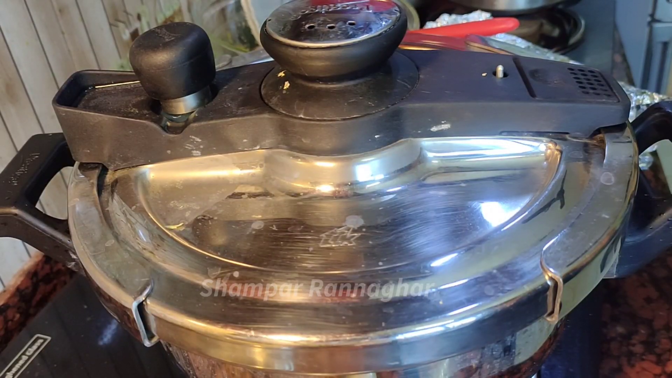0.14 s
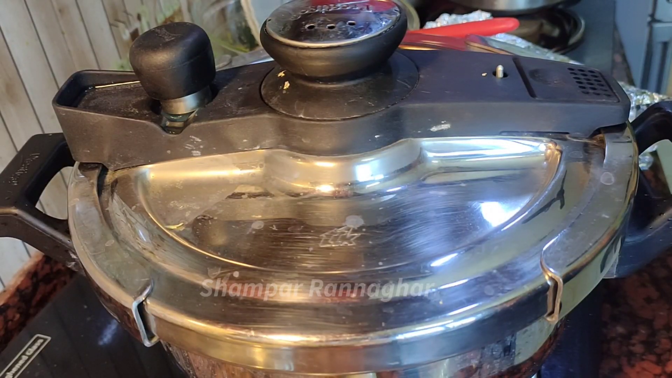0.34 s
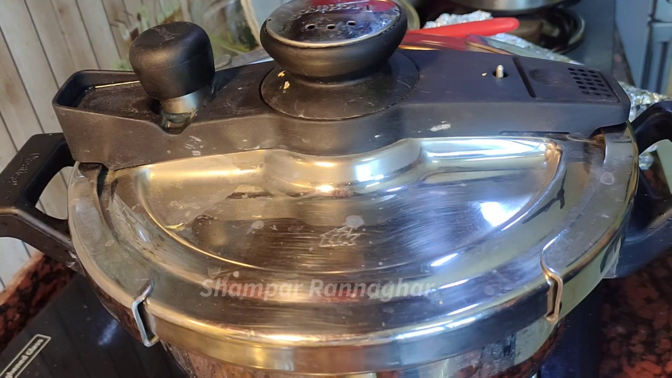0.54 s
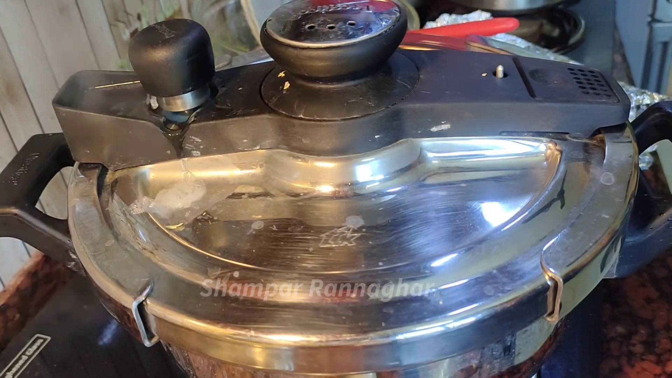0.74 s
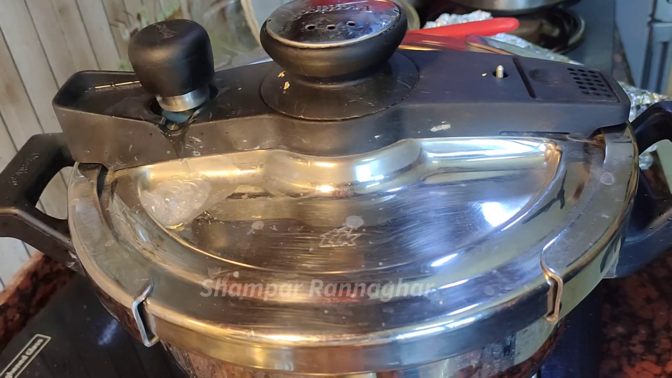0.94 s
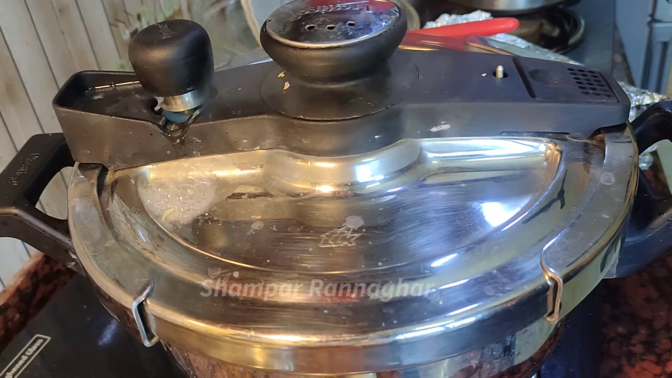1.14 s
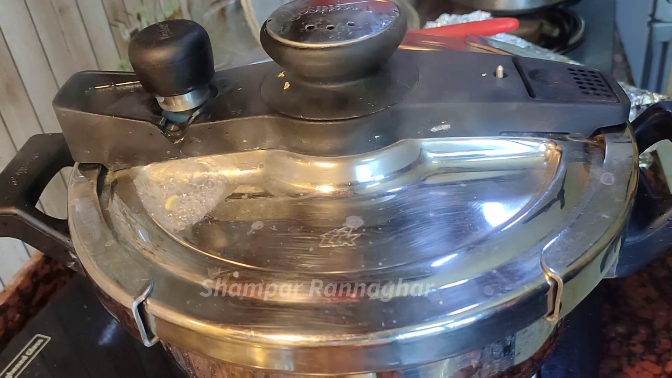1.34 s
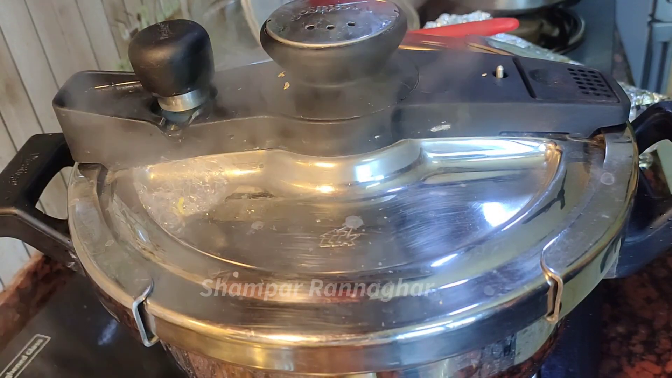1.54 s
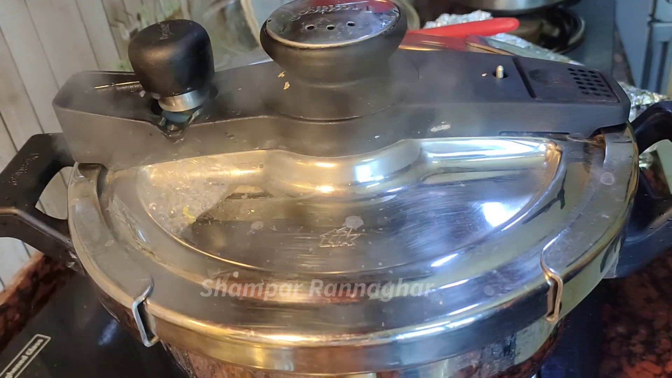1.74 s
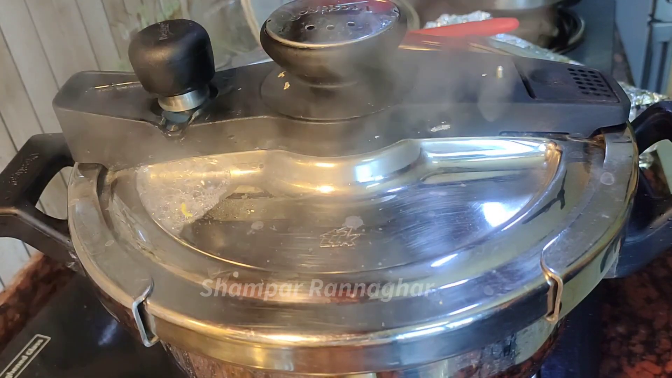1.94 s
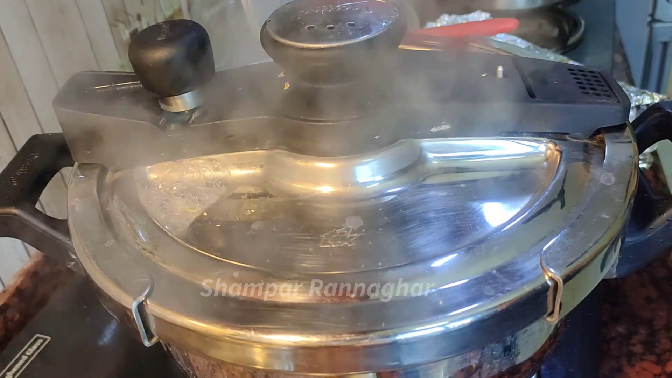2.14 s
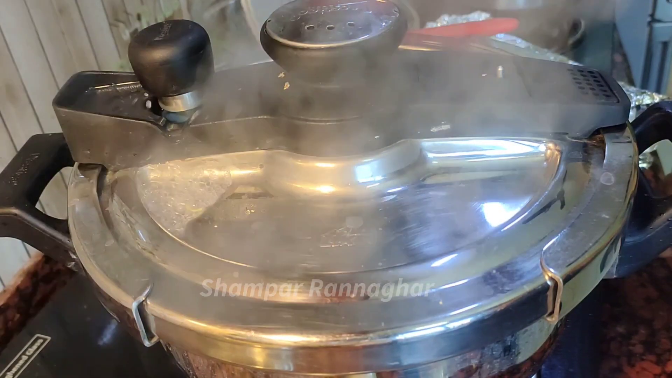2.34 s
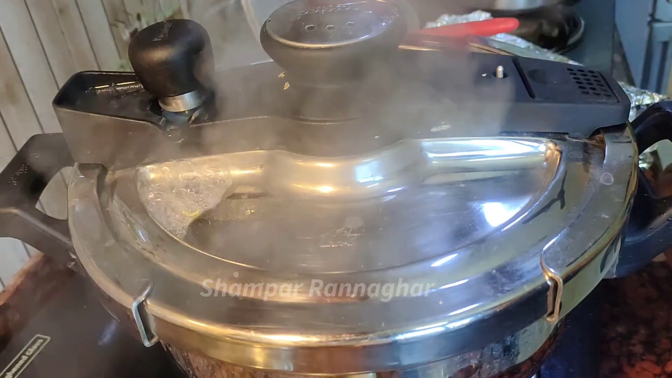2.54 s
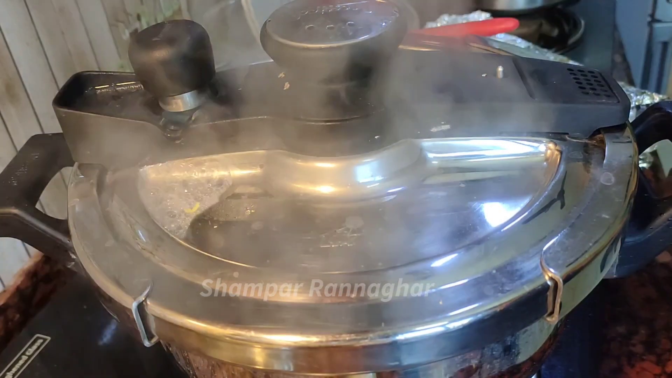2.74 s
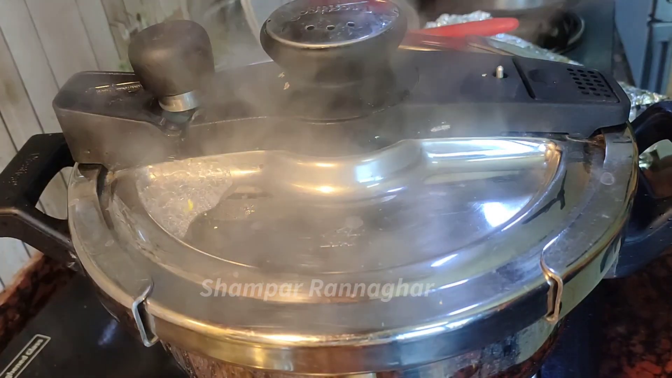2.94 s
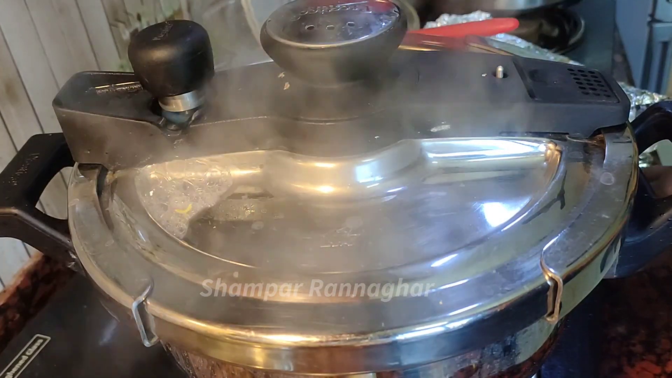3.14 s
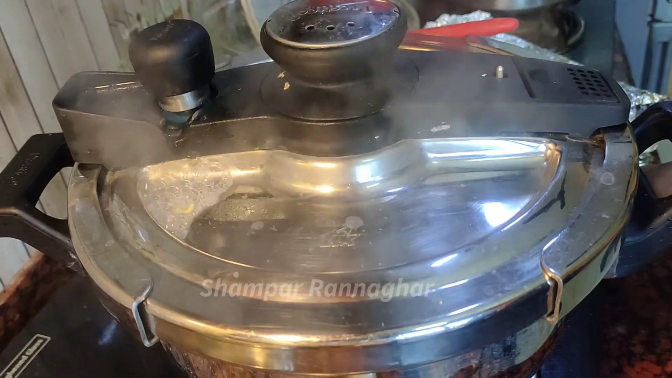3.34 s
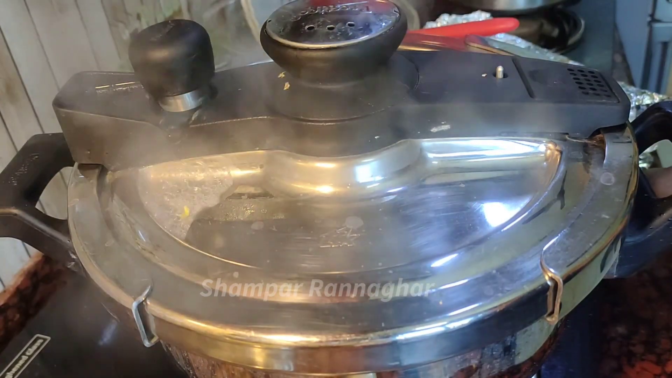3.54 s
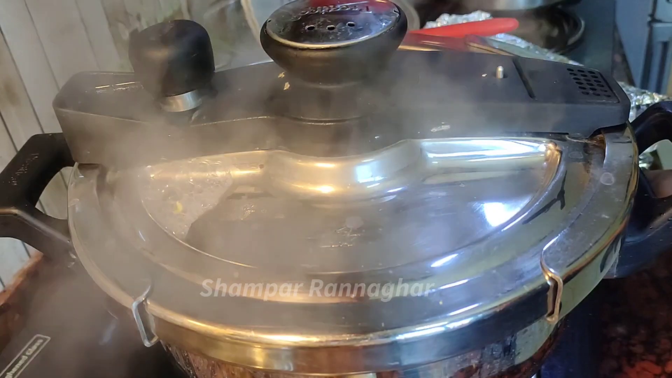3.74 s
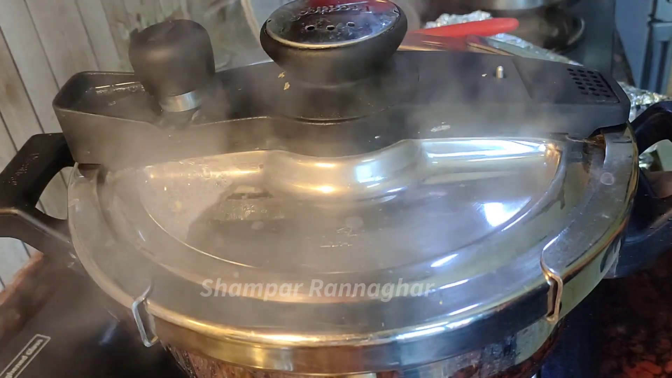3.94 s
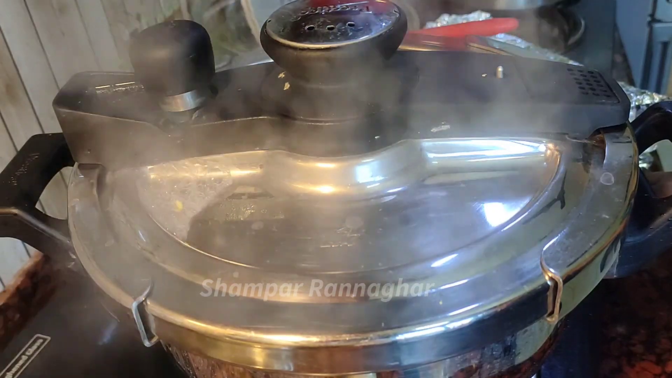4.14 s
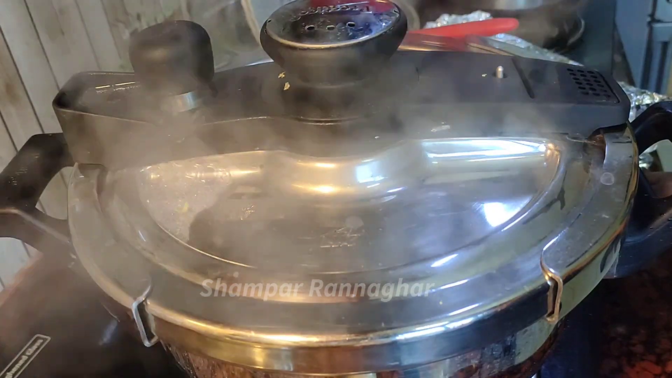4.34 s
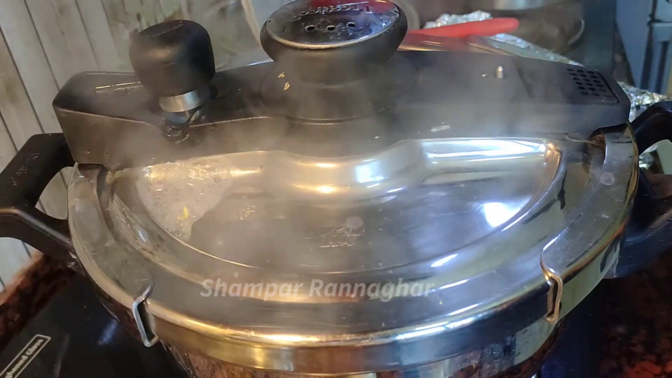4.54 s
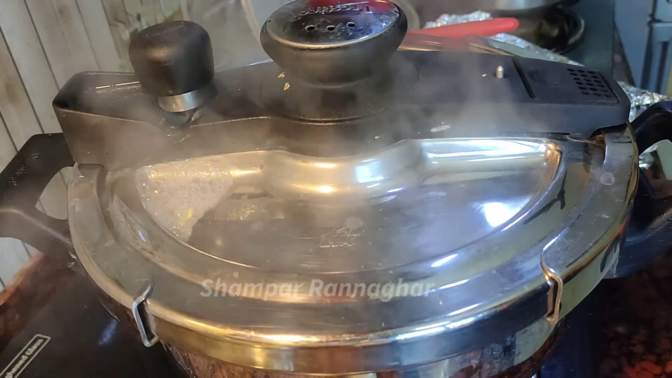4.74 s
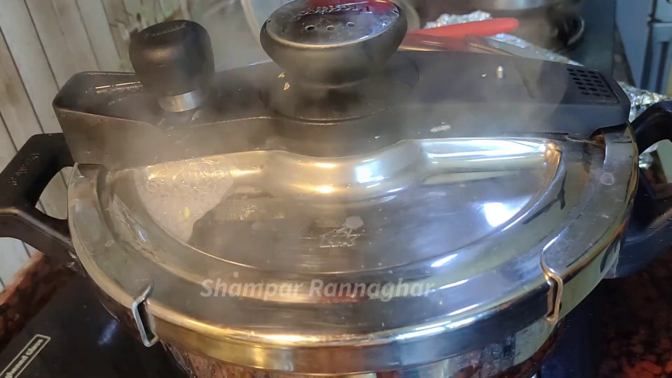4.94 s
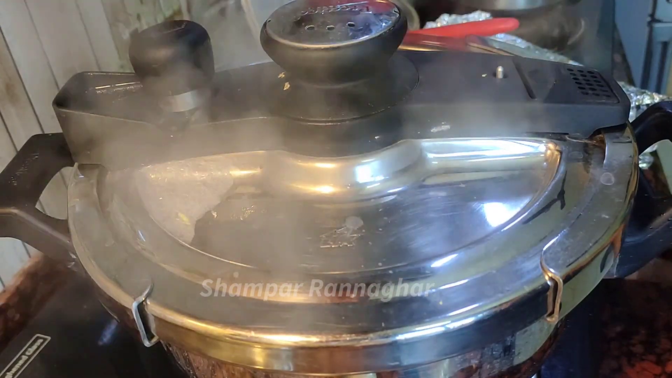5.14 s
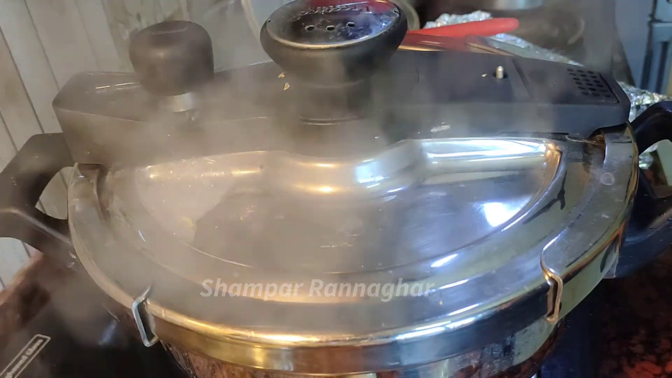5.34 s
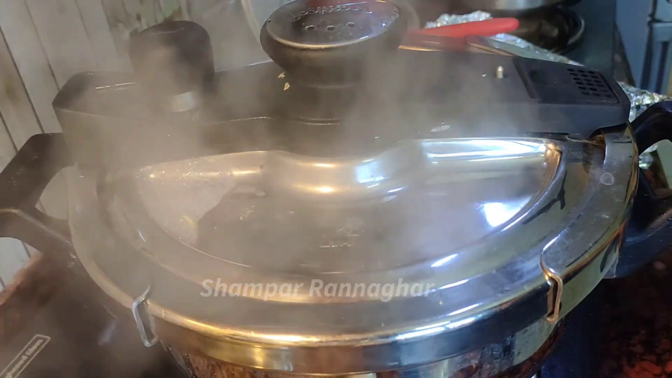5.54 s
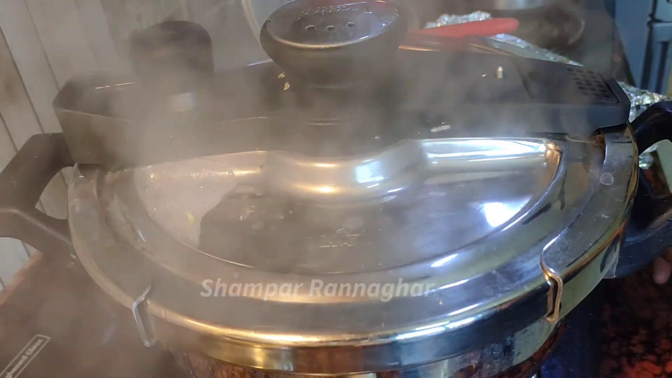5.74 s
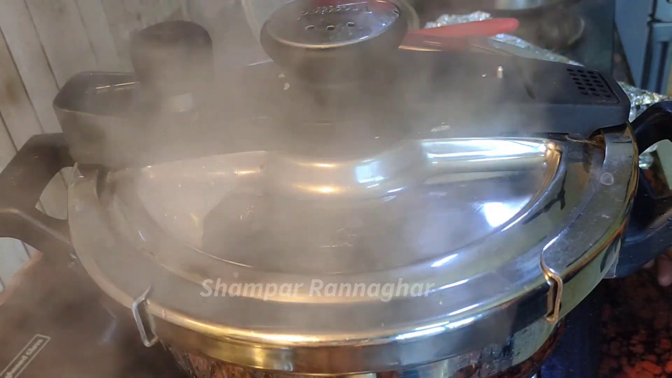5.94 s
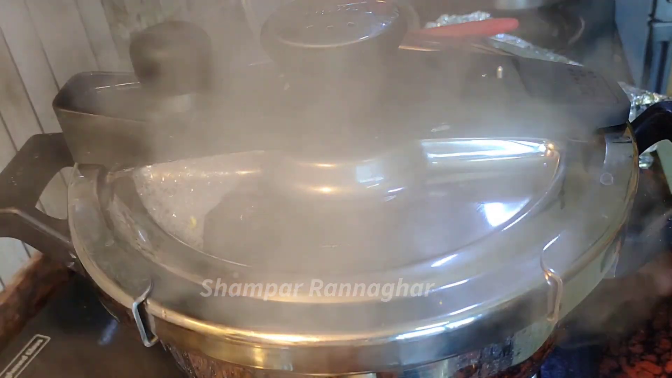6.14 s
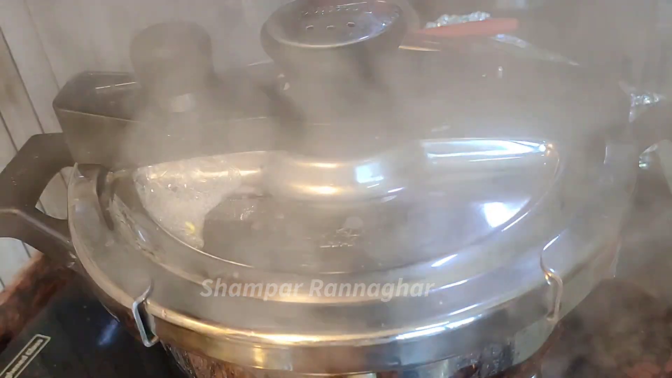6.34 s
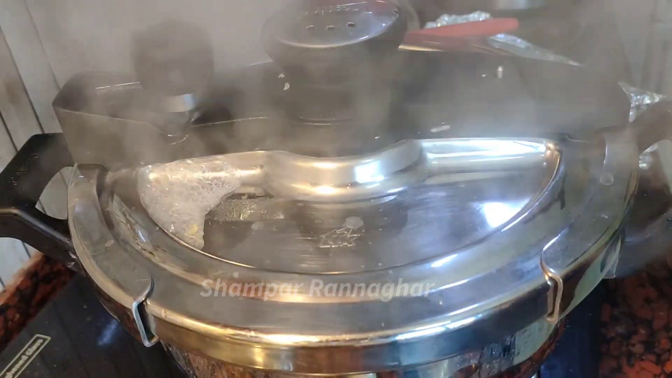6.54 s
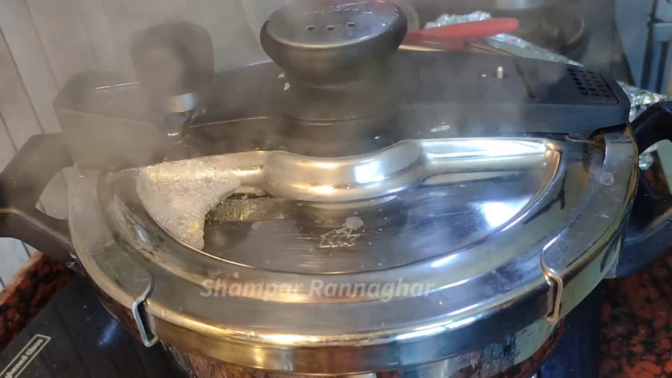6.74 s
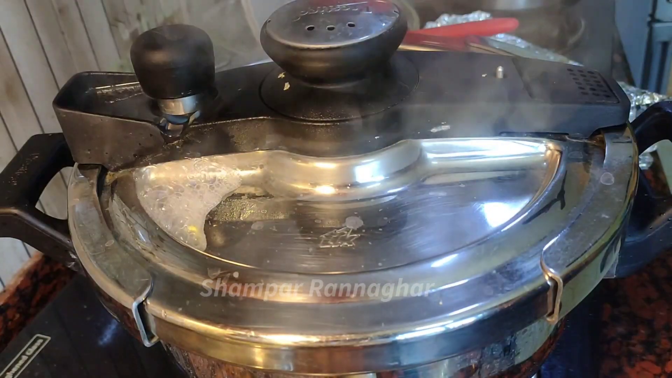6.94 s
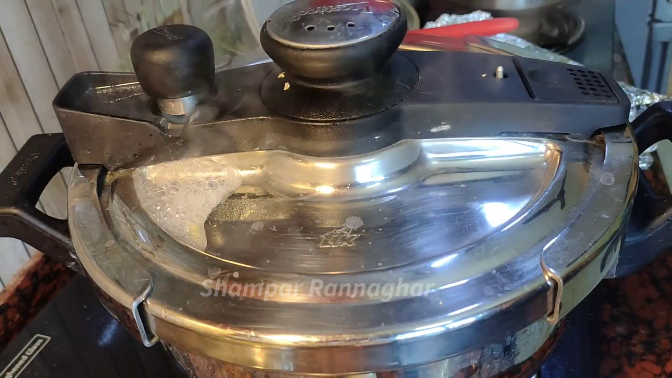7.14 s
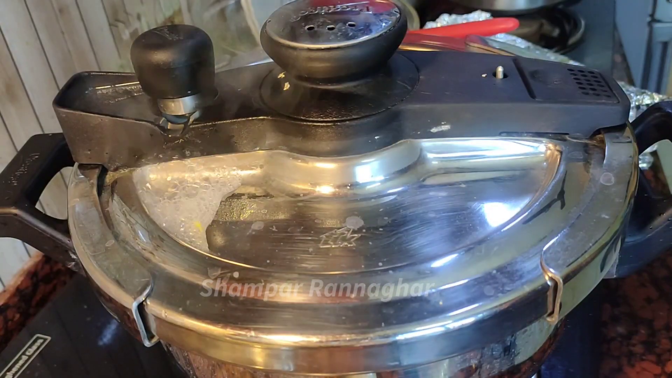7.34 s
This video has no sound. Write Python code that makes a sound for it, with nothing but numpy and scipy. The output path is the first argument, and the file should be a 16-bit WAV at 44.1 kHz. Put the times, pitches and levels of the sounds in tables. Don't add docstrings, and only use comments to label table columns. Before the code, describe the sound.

Quiet flame rumble and a faint flickering steam leak, which weakens just before a sudden surge. Steam then blasts steadily for about six seconds, harsh, dense and metallic, with a narrow high whistle coming and going. Late in the blast there is one dull tap, then the weight drops, the steam cuts off quickly and the stove's low roar returns. Close phone pickup, small kitchen, dull top end.

```python
import sys
import numpy as np
from scipy import signal
from scipy.fft import rfft, irfft, next_fast_len
from scipy.io import wavfile
from scipy.ndimage import uniform_filter1d

SR = 44100
rng = np.random.default_rng(int(sys.argv[2]) if len(sys.argv) > 2 else 0)


def attenuation_scalar(level_db):
    decades = np.asarray(level_db, float) / 20
    return 10 ** decades


def put_to_file(sound):
    columns = np.atleast_2d(sound).T
    safe = np.clip(columns, -1, 1)
    whole_steps = np.round(safe * 32767)
    wavfile.write(sys.argv[1], SR, whole_steps.astype(np.int16))


N = 330564

WHISTLE_HZ, WHISTLE_WIDTH_HZ = 3457, 70


def seconds():
    return np.arange(N) / SR


def unit(x):
    return x / np.sqrt(np.mean(x ** 2))


def columns(table):
    s, *values = np.transpose(table)
    return [np.interp(seconds(), s, v) for v in values]


def walk(rate_hz):
    hold = int(SR / rate_hz)
    levels = rng.standard_normal(4 * N // hold + 2)[:N // hold + 1]
    steps = np.repeat(levels, hold)
    slewed = uniform_filter1d(uniform_filter1d(steps, hold), hold)
    return unit(slewed[:N])


def colour(x, points, peaks):
    size = next_fast_len(N)
    hz = np.maximum(np.arange(size // 2 + 1) * SR / size, 1)
    at_hz, db = np.transpose(points)
    broad = attenuation_scalar(np.interp(np.log(hz), np.log(at_hz), db))
    power = 1 + sum(attenuation_scalar(2 * d) / (1 + (2 * (hz - f) / w) ** 2) ** 2 for f, w, d in peaks)
    return irfft(rfft(x, size) * broad * np.sqrt(power), size)[:N]


def band(x, lo_hz, hi_hz):
    size = next_fast_len(N)
    hz = np.arange(size // 2 + 1) * SR / size
    return irfft(rfft(x, size) * ((hz >= lo_hz) & (hz < hi_hz)), size)[:N]


def turbulence(gust_db, patch_db, flicker_db, gust_hz, flicker_hz):
    edges_hz = np.r_[0, 350 * 2 ** np.arange(0, 5, .5), SR / 2]
    noise, gust = rng.standard_normal(N), walk(gust_hz)
    patch = [walk(11) for _ in edges_hz]
    out = 0
    for k in range(len(edges_hz) - 1):
        db = gust_db * gust + patch_db * (patch[k] + patch[k + 1]) + flicker_db * walk(flicker_hz)
        out = out + attenuation_scalar(db) * band(noise, edges_hz[k], edges_hz[k + 1])
    return out


def jet():
    # frequency in Hz, density in dB per Hz.
    jet_colour = [(300, -28.5), (900, -19.5), (1700, -13.5), (2080, -14), (2330, -8.5), (3000, -7.5),
                  (3550, -10.5), (3720, -15), (4500, -7.0), (5500, -9.5), (6300, -4), (7580, 0),
                  (7900, -13.5), (8450, -29.5)]
    # frequency in Hz, width in Hz, level in dB.
    lid_modes = [(1044, 194, 2.2), (1545, 131, 5.5), (2142, 48, 4.7), (2356, 65, 7.1), (2484, 96, 6.3),
                 (2677, 156, 6.8), (2834, 68, 7.4), (2937, 85, 7.0), (3123, 122, 9.5), (3208, 44, 9.6),
                 (3320, 76, 10.7), (3457, 97, 15.0), (3636, 145, 10.3), (3824, 206, 8.2), (3954, 93, 9.5),
                 (4062, 42, 9.6), (4174, 174, 8.9), (4265, 36, 6.8), (4344, 40, 5.5), (4396, 54, 3.0),
                 (4711, 98, -0.0), (4923, 67, 7.1), (5037, 144, 5.2), (5255, 149, 8.1), (5363, 65, 3.8),
                 (5677, 329, 4.5), (5977, 399, 1.8), (6216, 95, 1.3), (6620, 399, 5.3), (7092, 391, -0.5)]
    # lower edge in Hz, upper edge in Hz.
    ranges_hz = [(0, 2080), (3700, 5450), (5450, 7850), (7850, 20000)]
    eddies = turbulence(gust_db=.35, patch_db=.2, flicker_db=.6, gust_hz=18, flicker_hz=35)
    lid = [(f, w, d - 6 * (abs(f - WHISTLE_HZ) < w)) for f, w, d in lid_modes]
    steam = colour(eddies, jet_colour, lid)
    parts = [band(steam, lo, hi) for lo, hi in ranges_hz]
    body = steam - sum(parts)
    return sum(blow(k) * unit(part) for k, part in enumerate([*parts, body]))


def whistle():
    flat = [(1, 0), (SR, 0)]
    breath = colour(rng.standard_normal(N), flat, [(WHISTLE_HZ, WHISTLE_WIDTH_HZ, 50)])
    wander_db = 0.7 * walk(6.5)
    return blow(part=5) * attenuation_scalar(wander_db) * unit(breath)


def blow(part):
    # level in dB, share of the pressure loss (ratio), change at full wetness in dB.
    steady = [(-34, 0.4, 2.5), (-22, -0.25, 0.8), (-15.5, 0.77, -0.8), (-35, 1.6, -3), (-19.5, 0.84, 0.3),
              (-26, .2, -3.5)]
    # opening in seconds, rise in seconds, surge in dB, shutting in seconds, fall in dB per second.
    onsets = [(.7, 0.011, 3, 6.99, 127), (0.701, 0.023, 0, 6.92, 167), (0.665, .1, 1.2, 6.96, 219.5),
              (.685, 0.072, 1, 6.96, 347), (0.699, 0.031, 2.5, 6.916, 113), (.745, 0.023, 7, 6.87, 148.5)]
    # time in seconds, pressure lost in dB, wetness 0-1.
    steam_state = [(.9, 0.3, 0.06), (1.4, 0.4, 0), (1.9, 1.3, 0.16), (2.4, 0.5, 0.8), (3.1, 0.4, 0.84),
                   (3.6, 0.3, 0.7), (4.2, 1.3, 0.24), (4.8, 0.8, .3), (5.4, 2, 0.2), (5.9, 1.5, 0.35),
                   (6.35, 3.5, .5), (6.75, 3, 0.13)]
    surge_s, echo_db, echo_t60_s = 0.2, -16.5, 1
    catch_s, catch_length_s, catch_db = .742, .016, -2.5
    t = seconds()
    level_db, share, wet_db = steady[part]
    opens_s, rise_s, surge_db, shuts_s, fall_db_per_s = onsets[part]
    lost_db, wetness = columns(steam_state)
    since = np.maximum(t - opens_s, 0)
    after = np.maximum(t - shuts_s, 0)
    db = level_db - share * lost_db + wet_db * wetness
    db += surge_db * np.exp(-since / surge_s)
    db += catch_db * np.exp(-((t - catch_s) / catch_length_s) ** 2)
    echo = attenuation_scalar(echo_db - 60 * after / echo_t60_s)
    shut = np.hypot(attenuation_scalar(-fall_db_per_s * after), echo)
    return attenuation_scalar(db) * (1 - np.exp(-since / rise_s)) * shut


def spit():
    start_s, length_s, level_db = .715, .13, -36
    since = seconds() - start_s
    gate = np.clip(np.minimum(since / .012, (length_s - since) / .03), 0, 1)
    gush = unit(band(rng.standard_normal(N), 596, 1400))
    return gate * attenuation_scalar(level_db + 1.1 * walk(45)) * gush


def leak():
    # frequency in Hz, density in dB per Hz.
    leak_colour = [(1500, -20), (2200, -19), (2750, -11.5), (3500, -17.5), (4700, -21.5), (5250, -10),
                   (5500, -16.5), (5700, -15), (6500, -6), (7250, -7), (7450, -9), (7750, -16.5),
                   (7950, -28), (8420, -37.5)]
    # frequency in Hz, width in Hz, level in dB.
    leak_ring = [(2684, 60, 10.5), (2950, 36, 2), (2985, 58, 6.5), (5420, 110, 1.5), (5770, 60, 13),
                 (5740, 62, 8.5), (6070, 60, 9), (6230, 60, 6.5), (6000, 55, 0), (6470, 86, 4),
                 (6840, 90, 0), (6900, 60, 6), (7160, 71, 6.5), (7240, 61, 1), (7600, 170, 1)]
    leak_db, low_db, chokes_s, choke_db_per_s = -29.5, -7, 0.41, 18.5
    t = seconds()
    eddies = turbulence(gust_db=.6, patch_db=.25, flicker_db=.7, gust_hz=14, flicker_hz=35)
    hiss = colour(eddies, leak_colour, leak_ring)
    low = band(hiss, 0, 4600)
    seated = np.clip((.74 - t) / 0.039, 0, 1)
    level_db = leak_db - choke_db_per_s * np.maximum(t - chokes_s, 0)
    return seated * attenuation_scalar(level_db) * (unit(hiss - low) + attenuation_scalar(low_db) * unit(low))


def pings():
    # time in seconds, peak in dB, frequency in Hz, swell in seconds.
    rings = [
        (.515, -40, 1290, 0.048),
        (.59, -38, 620, 0.009),
        (.685, -31, 119.6, 0.0089),
        (.715, -36, 1530, 0.0066),
        (.75, -33, 820, 0.011),
        (.79, -31.5, 1010, 0.011),
        (6.83, -20, 3480, 0.027),
        (7.0, -36.5, 1250, 0.03),
    ]
    t = seconds()
    out = 0
    for at_s, peak_db, hz, swell_s in rings:
        swell = np.exp(-((t - at_s) / swell_s) ** 2)
        out = out + attenuation_scalar(peak_db) * swell * np.sin(2 * np.pi * hz * t)
    return out


def knock():
    # frequency in Hz, level in dB, t60 in seconds.
    knock_modes = [(560, -14, .15), (730, -2, .07), (880, 0, .06), (1280, -9, .12), (1640, -12, .12),
                   (2010, -6, .14)]
    knock_s, knock_db = 6.273, -15
    since = np.maximum(seconds() - knock_s, 0)
    ring = sum(attenuation_scalar(d - 60 * since / t60) * np.sin(2 * np.pi * f * since) for f, d, t60 in knock_modes)
    echo = attenuation_scalar(-15 - 60 * since / .25) * unit(band(rng.standard_normal(N), 420, 2300))
    tap = (ring + echo) * np.minimum(since / 0.0019, 1)
    return attenuation_scalar(knock_db) * tap / np.abs(tap).max()


def stove():
    # frequency in Hz, density in dB per Hz.
    rumble_colour = [(25, -25.5), (42, -41.5), (55, -38), (62, -11), (270, -11), (282, -24.5), (400, -53.5)]
    # frequency in Hz, width in Hz, level in dB.
    room = [(72.4, 14, 13.5), (89.5, 16, 6.5), (107.6, 9.9, 12.5), (128.3, 17, 11), (168, 22, 9),
            (201, 11, 0), (228.7, 41, 9), (241.2, 22, 11.5), (260, 21, 7)]
    # frequency in Hz, density in dB per Hz.
    flame_colour = [(200, -21), (290, -4.5), (700, -4), (1400, -5.5), (2000, -7.5), (3000, -11),
                    (4500, -15.5), (5300, -15), (6500, -11.5), (7300, -22.5), (7700, -20.5), (8000, -37.5),
                    (8300, -49.5), (8450, -69.5)]
    # frequency in Hz, width in Hz, level in dB.
    flame_ring = [(313.6, 26, 6), (458.5, 46, 7), (585, 15, 3.5), (690, 40, 2.5), (1290, 14, 9.5)]
    rumble_db, flame_db = -31.5, -36.5
    duck_s, attack_s, ease_per_s, unduck_s, release_s = 0.73, .12, .1, 6.8, .2
    duck_rumble_db, duck_flame_db = -5.5, -3.5
    t = seconds()
    since = np.maximum(t - duck_s, 0)
    duck = (1 - np.exp(-since / attack_s)) * (1 - ease_per_s * since)
    duck *= np.exp(-np.maximum(t - unduck_s, 0) / release_s)
    rumble = colour(attenuation_scalar(.3 * walk(7.8)) * rng.standard_normal(N), rumble_colour, room)
    eddies = turbulence(gust_db=.6, patch_db=.4, flicker_db=.9, gust_hz=10, flicker_hz=20)
    flame = colour(eddies, flame_colour, flame_ring)
    rumble_gain = attenuation_scalar(rumble_db + duck_rumble_db * duck)
    flame_gain = attenuation_scalar(flame_db + duck_flame_db * duck)
    return rumble_gain * unit(rumble) + flame_gain * unit(flame)


def scene():
    return (jet() + whistle() + spit() + leak() + pings() + knock() + stove())[None]


def top_cut(x):
    return signal.sosfilt(signal.butter(12, 9020, fs=SR, output="sos"), x)


def record(dry):
    top_hz, stop_s = 8440, 7.38958
    rounded = dry / (1 + (dry / .8) ** 6) ** (1 / 6)
    low_pass = signal.ellip(8, .1, 35, top_hz, fs=SR, output="sos")
    x = signal.sosfiltfilt(low_pass, rounded)
    return top_cut(x * (np.arange(N) < stop_s * SR))


dry = scene()
out = record(dry)
put_to_file(out)
```